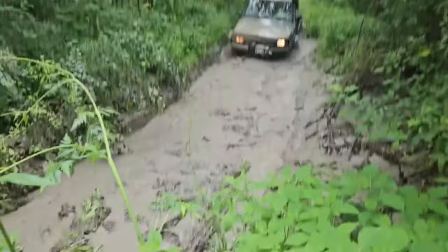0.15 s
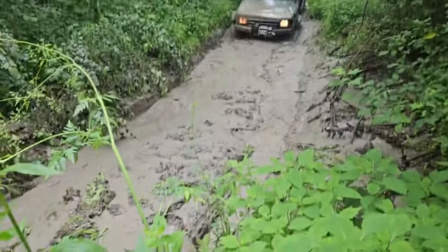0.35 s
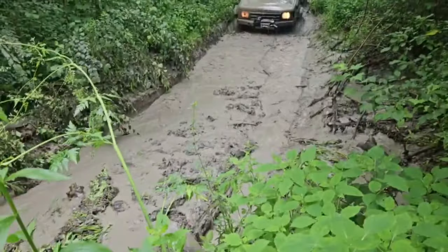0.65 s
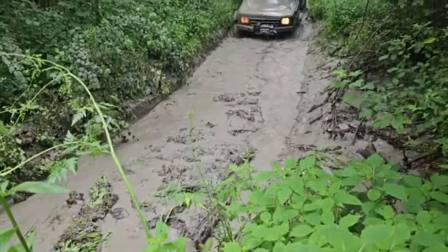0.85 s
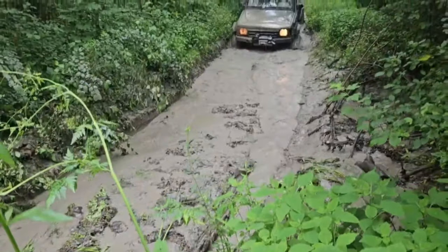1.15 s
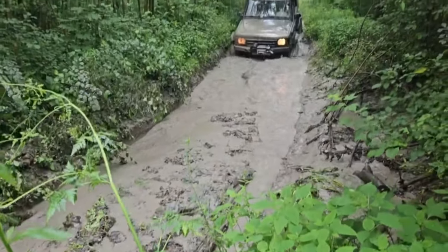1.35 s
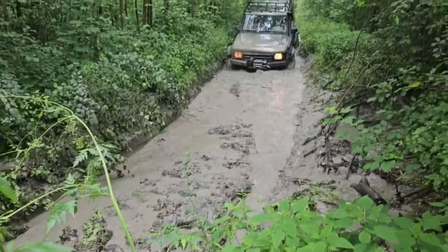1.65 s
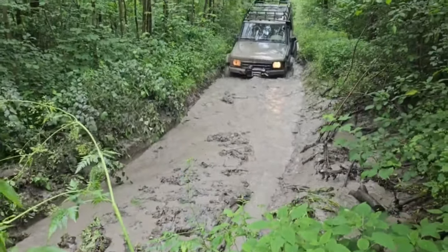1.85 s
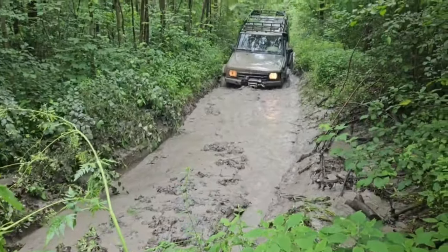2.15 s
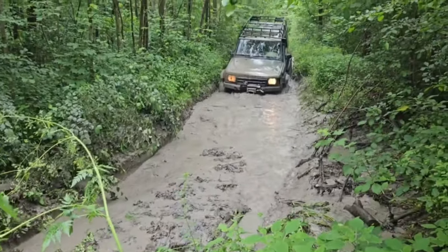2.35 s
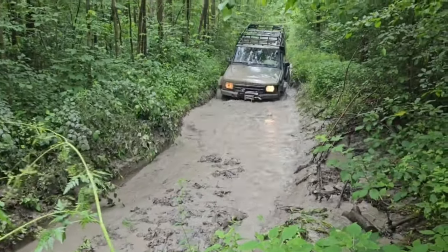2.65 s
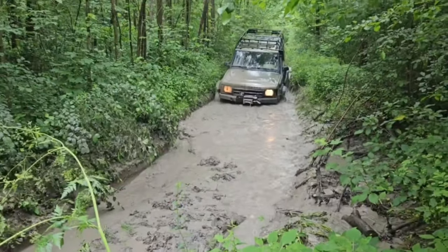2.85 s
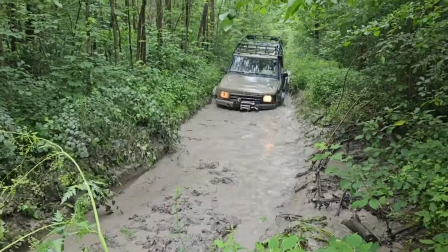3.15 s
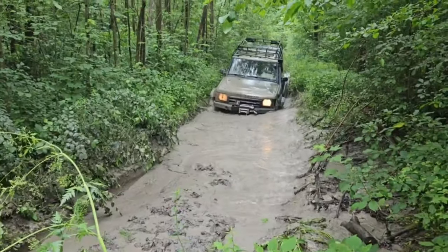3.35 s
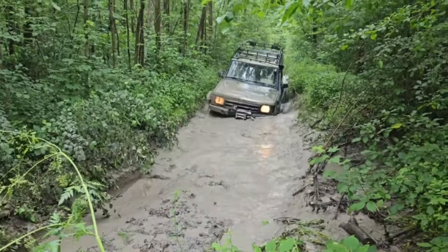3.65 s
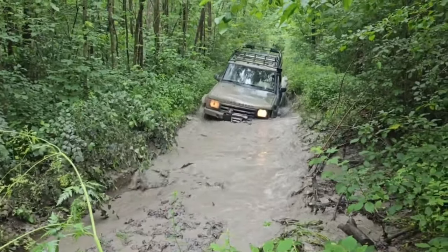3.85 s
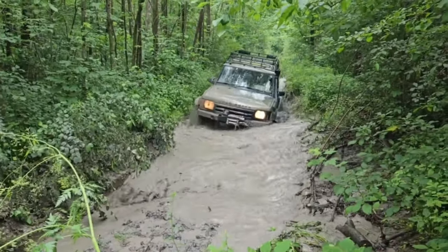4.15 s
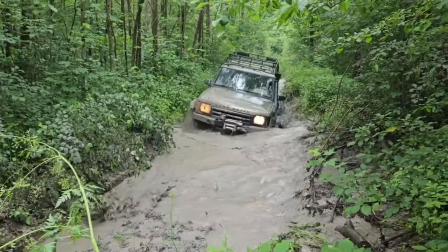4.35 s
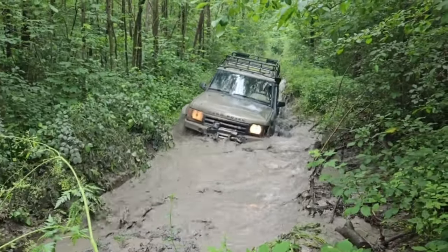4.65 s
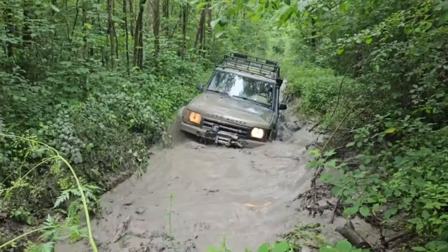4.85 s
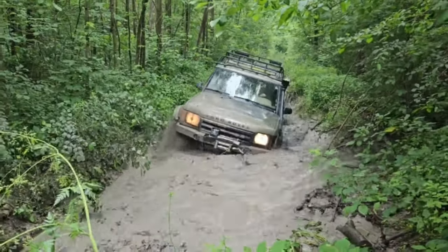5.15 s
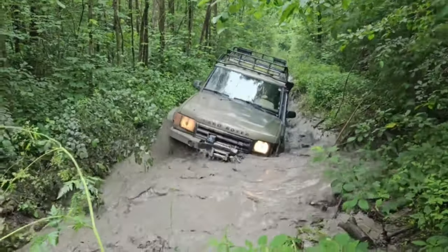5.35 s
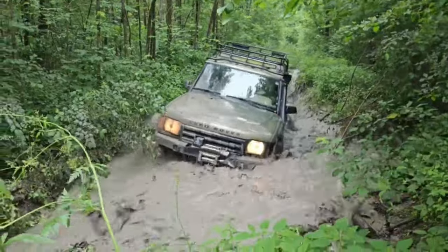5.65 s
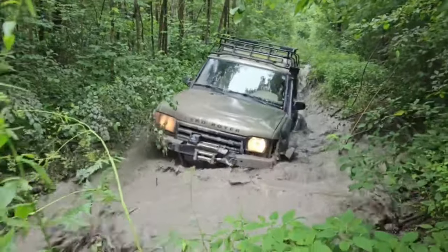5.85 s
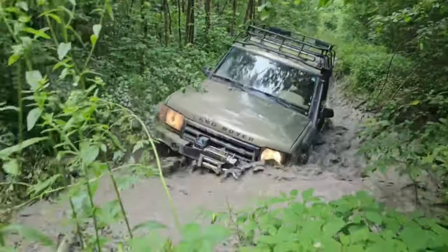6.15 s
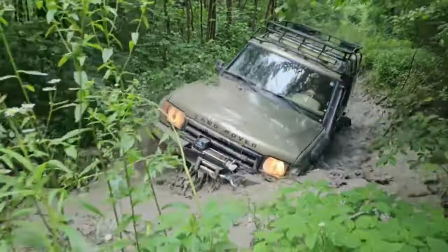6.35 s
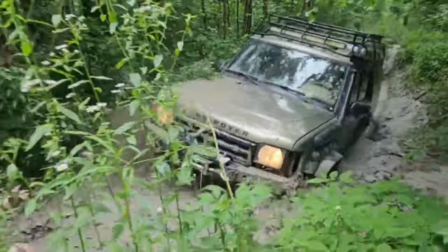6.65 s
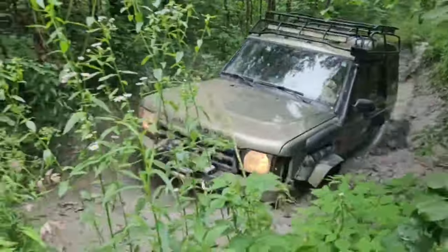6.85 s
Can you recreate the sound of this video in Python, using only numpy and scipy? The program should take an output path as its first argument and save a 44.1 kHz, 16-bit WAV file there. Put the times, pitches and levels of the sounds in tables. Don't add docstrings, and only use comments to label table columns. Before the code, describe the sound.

A throaty eight-cylinder engine sinks to a lumpy idle, then revs hard and roars closer through hissing, churning mud in a forest.

```python
import sys
import numpy as np
from scipy import signal
from scipy.fft import rfft, irfft, next_fast_len
from scipy.io import wavfile
from scipy.ndimage import uniform_filter1d

SR = 44100
rng = np.random.default_rng(int(sys.argv[2]) if len(sys.argv) > 2 else 0)


def unload_audio(sound):
    columns = np.transpose(np.atleast_2d(sound))
    steps = np.round(np.clip(columns, -1, 1) * 32767)
    wavfile.write(sys.argv[1], SR, steps.astype(np.int16))


def linear_from_db(decibels):
    return 10 ** (np.asarray(decibels, float) / 20)


N = 308259
ROOMY = next_fast_len(N)


def level(x, db):
    return x * linear_from_db(db) / np.sqrt(np.mean(x ** 2))


def curves(table):
    s, *columns = np.transpose(table)
    return [np.interp(np.arange(N) / SR, s, c) for c in columns]


def along(table, hz, column=1):
    table = np.array(table)
    return np.interp(np.log(np.maximum(hz, 1)), np.log(table[:, 0]), table[:, column])


def bumps(table):
    s, length, *strengths = np.transpose(table)
    coarse = np.arange(0, N, 32)
    shape = np.exp(-((coarse / SR - s[:, None]) / (length[:, None] / 2)) ** 2)
    return [np.interp(np.arange(N), coarse, db @ shape) for db in strengths]


def swell(start, attack, hold, release, db, quiet_db=-15):
    corners = np.cumsum([start, attack, hold, release])
    return db + np.interp(np.arange(N) / SR, corners, [quiet_db, 0, 0, quiet_db])


def walk(rate):
    k = int(SR / rate)
    steps = np.repeat(rng.standard_normal(N // k + 1), k)
    return 1.34 * uniform_filter1d(uniform_filter1d(steps, k), k)[:N]


def band(x, hz, width):
    return signal.lfilter(*signal.iirpeak(hz, hz / width, fs=SR), x)


def shelf(x, hz, db):
    treble = signal.sosfiltfilt(signal.butter(3, hz, "high", fs=SR, output="sos"), x)
    return x + treble * (linear_from_db(db) - 1)


def coloured(spectrum, flicker_db, rate):
    # (frequency [Hz], shared part [0-1])
    likeness = [(300, 0.99), (700, 0.85), (1400, 0.84), (2500, 0.05), (6000, 0.04)]
    hz = np.fft.rfftfreq(ROOMY, 1 / SR)
    like = np.clip(along(likeness, hz), 0, 1)
    shared, left, right = rfft(rng.standard_normal((3, ROOMY)))
    pair = np.sqrt(like) * shared + np.sqrt(1 - like) * np.array([left, right])
    pair = pair * linear_from_db(along([(13, -68)] + spectrum, hz))
    out = 0
    for octave in range(7, 15):
        part = np.cos(np.pi / 2 * np.clip(np.log2(hz + 1) - octave, -1, 1)) ** 2
        out = out + irfft(pair * part, ROOMY)[:, :N] * linear_from_db(flicker_db * walk(rate))
    return level(out, 0)


def splatter(rate, scatter_db, db):
    grains = (rng.random(N) < rate / SR) * linear_from_db(scatter_db * rng.exponential(size=N))
    tails = signal.lfilter([1], [1, -np.exp(-1 / (0.0085 * SR))], grains)
    return np.sqrt(1 + level(tails, db) ** 2)


def firing_beat(turns):
    return 1 + 0.049 * np.cos(16 * np.pi * turns)


def spray_hiss(turns, churn, surge, distance):
    # (frequency [Hz], density [dB per Hz])
    spectrum = [(880, -29), (1500, 1), (1790, -4), (2240, -3.5), (2810, -6), (6700, -8.5), (7320, -6.5),
                (8470, -7), (8900, -5.5), (9620, -13), (11000, -12.5), (12700, -8), (14800, -15.5),
                (15500, -14.5)]
    hiss = coloured(spectrum, flicker_db=0.83, rate=6.5) * splatter(rate=120, scatter_db=3.0, db=-10)
    leaves_db, leaves_m = 3.5, 3.7
    hiss = shelf(firing_beat(turns) * hiss, 6700, leaves_db * np.exp(-(distance / leaves_m) ** 2) - 2)
    air_db_per_m = 0.06
    hiss = shelf(hiss, 10600, air_db_per_m * (9.0 - distance))
    return linear_from_db(churn + surge + 7.0 + 0.5 * walk(5)) * hiss


def mud_roar(turns, churn, surge):
    # (frequency [Hz], density [dB per Hz])
    spectrum = [(190, 3.5), (330, -2.5), (439, -7.5), (515, -12), (544, -4.5), (1030, -9.5), (1400, -9),
                (1730, -18), (2200, -19), (2860, -43), (4840, -120)]
    roar = coloured(spectrum, flicker_db=0.33, rate=9) * splatter(rate=90, scatter_db=3.5, db=-11)
    return linear_from_db(-32.5 + 0.915 * (churn + 42) + surge) * firing_beat(turns) * roar


def drops():
    # (time [s], peak level [dB], pitch [Hz])
    flicks = [
        (.897, -41, 12500),
        (1.462, -38, 13000),
        (1.738, -38, 4500),
        (1.865, -36, 3200),
        (2.51, -45, 14000),
    ]
    out, t = np.zeros(N), np.arange(400) / SR
    for s, db, hz in flicks:
        i = int(s * SR)
        burst = band(rng.standard_normal(len(t)), hz, 0.25 * hz)
        out[i:i + len(t)] += linear_from_db(db) * 4 * np.exp(-t / 0.002) * burst
    return out


def panel_drone():
    # (start [s], attack [s], hold [s], release [s], level [dB])
    shaking = (4.25, .2, .75, .3, -42)
    ring = band(band(rng.standard_normal(N), 523.0, 30.0), 510.0, 54.0)
    return linear_from_db(swell(*shaking)) * level(ring, 0)


def belt_whine(turns):
    # (start [s], attack [s], hold [s], release [s], level [dB])
    slip = (4.8, .3, 1.4, .5, -48)
    whine_order = 45
    return linear_from_db(swell(*slip) + 10.5 + 1.5 * walk(12)) * np.sin(2 * np.pi * whine_order * turns)


def growl(turns):
    cylinders_db = [0, -1.5, -1.5, -11, -4.5, -7, -2, -4]
    # (frequency [Hz], width [Hz], level [dB])
    pipe = [(58.5, 13, 5), (102.7, 81, 9), (155, 68, -1.5), (273, 130, -5.5), (413, 134, -18.5)]
    firing = np.floor(8 * turns).astype(int)
    uneven_db = 0.54 * rng.standard_normal(firing[-1] + 1)[firing]
    size = linear_from_db(np.array(cylinders_db)[firing % 8] + uneven_db)
    puff = 0.26 + np.exp(-(8 * turns % 1) / 0.26)
    gas = size * puff * rng.standard_normal(N)
    return level(sum(linear_from_db(db) * band(band(gas, hz, width), hz, 1.13 * width) for hz, width, db in pipe), 0)


def orders(hz, turns, strong_db):
    # (order [per cycle], neighbour [order, 0 = growl], level over it [dB])
    minor = [(2.005, 3, -15), (4, 3, -31), (5.98, 5, -15), (6.96, 5, -15), (8.94, 8, -25), (9.91, 0, -3),
             (10.99, 0, -10), (11.77, 0, -10), (13.25, 0, -9), (15.18, 0, -13.5), (16.8, 0, -19.5),
             (19.06, 0, -10.5), (21.06, 0, -14.5), (24, 16, -21)]
    # (frequency [Hz], level [dB])
    tail_pipe = [(45, -11), (62, 5.5), (100, 8), (200, 2.5), (290, 3.5), (330, -7), (420, -7.5), (515, 1.5),
                 (580, -9)]
    lines = [(k, db) for k, db in strong_db.items() if k > 0]
    for k, near, db in minor:
        lines.append((k, strong_db[near] + db + along(tail_pipe, k * hz) + 4.94 * walk(8)))
    out = 0
    for k, db in lines:
        start = rng.random() * (k % 8 > 0)
        phase = k * turns + start + 0.021 * walk(22)
        out = out + np.sqrt(2) * linear_from_db(db + 0.4 * walk(25)) * np.cos(2 * np.pi * phase)
    return out


def exhaust(hz, turns, effort, growl_db, surge):
    # (frequency [Hz], level [dB])
    passed = [(33, -41), (55, -23.5), (67, -20), (100, -21), (138, -21.5), (156, -32.5), (180, -21),
              (260, -21.5)]
    # (frequency [Hz], level [dB])
    overtone = [(105, -23.5), (150, -24), (198, -44.5), (262, -29.5), (295, -34.5), (325, -42.5),
                (470, -45.5), (515, -35.5)]
    # (time [s], length [s], uneven
    # orders [dB], firing order [dB])
    chokes = [(.21, 0.11, -1, -17), (.74, 0.037, 0, -4), (3.24, .14, -3, 1.5), (4.11, 0.11, 4, -14.5),
              (4.6, 0.095, -5.5, -8), (4.735, 0.072, -8.5, -23), (4.82, .06, 3.5, 4),
              (4.89, 0.036, -10, -10), (5.07, 0.028, -9, -22), (5.14, 0.069, 2.5, 3.5),
              (5.225, 0.038, -15, -5.5), (5.34, 0.035, -1, -12), (5.44, .04, -10, -8),
              (5.53, 0.14, 2.5, -12.5), (5.55, 0.034, -20, -2), (5.68, 0.036, -7, -9),
              (5.92, 0.042, -3, -9), (6.01, 0.089, 5, -8.5), (6.12, .1, 5, -5.5), (6.3, .2, -3.5, -3.5),
              (4.38, 0.13, 1.5, -1.5), (0.03, 0.094, -6, 4), (3.38, .06, -1, 1.5), (5.8, 0.14, 0.5, 3),
              (6.61, 0.11, -6, -5), (6.45, 0.042, -8, -7), (6.88, 0.16, -2, -3)]
    uneven_choke, firing_choke = bumps(chokes)
    throttle_opens_s, opening_s = 2.46, 0.18
    closed = np.clip((throttle_opens_s - np.arange(N) / SR) / opening_s, 0, 1)
    uneven = uneven_choke - 6.5 * closed
    strong_db = {
        0: growl_db - 1.5 * closed + 1.36 * surge,
        3: 2.5 + uneven + along(passed, 3 * hz),
        5: -0.5 + uneven + along(passed, 5 * hz),
        8: 7 + effort + firing_choke + along(passed, 8 * hz),
        16: along(overtone, 16 * hz) - 2.5 * closed + firing_choke / 2 + 2.0 * walk(7),
    }
    gas_db = 3.5 + uniform_filter1d(growl_db + 0.35 * surge, size=4000)
    return orders(hz, turns, strong_db) + linear_from_db(gas_db) * growl(turns)


def scene():
    # (time [s], rate [Hz])
    speed = [(0, 17.3), (.19, 13.6), (.58, 12.25), (1.1, 9.2), (1.43, 9.3), (2.47, 6.6), (2.62, 8.0),
             (2.98, 15.25), (3.42, 23.1), (3.66, 25.3), (3.92, 26.1), (4.2, 23.7), (4.8, 27.5),
             (5.33, 28.3), (5.6, 30.35), (6.04, 29.85), (6.52, 32), (6.99, 31.75)]
    # (time [s], level [dB])
    firings = [(0, -7.5), (.55, -0.5), (1.0, -5.5), (1.5, -7.5), (1.8, -11), (2.4, -8.5), (2.65, 1.5),
               (3.15, 2), (3.4, -0.5), (3.7, -4.5), (4.5, -7), (5.15, -2), (5.7, -4.5), (6.2, -7.5),
               (6.5, 3), (6.99, -0.5)]
    # (time [s], level [dB])
    churning = [(0, -42), (.35, -44.5), (1.5, -48.5), (2.8, -49.5), (3.25, -47.5), (3.7, -43), (4.4, -41),
                (5.1, -39), (5.75, -37), (6.07, -36), (6.3, -35), (6.85, -38), (6.99, -38.5)]
    # (time [s], distance [m])
    approach = [
        (0, 27),
        (3, 21),
        (5.5, 9.38),
        (6.4, 5),
        (6.99, 1),
    ]
    # (time [s], length [s], growl [dB], roar [dB], hiss [dB])
    surges = [(1.19, 0.055, 5.5, 3.5, 0.5), (1.99, .08, 6, -1.5, -0.5), (3.35, 0.28, 6.5, 2.5, -1),
              (4.45, 0.16, 1, 3, 0), (4.87, 0.12, -10, 0.5, 0), (5.04, 0.036, 6, -1, 0.5),
              (5.56, 0.12, 1.5, -2, 0), (5.73, 0.18, 6.5, -1.5, -0.5), (3.9, 0.78, -1.5, 1.5, -1),
              (4.58, 0.072, 3, 0.5, 1), (.62, .15, -0.5, 1.5, 0), (6.02, 0.15, -2.5, 2, 0.5),
              (6.05, 0.41, -4, 0.5, 0), (6.29, .04, -12, 2, -0.5), (6.45, 0.14, 1.5, 4, 2),
              (6.66, 0.12, -9, 4, 1), (6.78, .08, 0.5, 1, -0.5), (4.97, 0.28, 2, -1, 0)]
    hz = uniform_filter1d(curves(speed)[0], size=4000)
    turns = np.cumsum(hz) / SR
    effort, churn, distance = curves(firings)[0], curves(churning)[0], curves(approach)[0]
    growl_surge, roar_surge, hiss_surge = bumps(surges)
    growl_db = -33.5 + 0.94 * (churn + 42) + 0.34 * effort
    mud = spray_hiss(turns, churn, hiss_surge, distance) + mud_roar(turns, churn, roar_surge) + drops()
    body = panel_drone() + belt_whine(turns)
    return mud + body + exhaust(hz, turns, effort, growl_db, growl_surge)


def roll_off(x):
    return signal.sosfilt(signal.butter(12, 15690, fs=SR, output="sos"), x)


def record(dry):
    # (frequency [Hz], left minus right [dB], right late by [samples])
    port_gap = [(60, 0.5, 2.2), (206, 2, 8.1), (940, 2, 7.1), (1810, 2, 12.1), (8000, 4, 11.4),
                (15000, -3, 12.6)]
    hz = np.fft.rfftfreq(ROOMY, 1 / SR)
    side = np.array([[0.5], [-0.5]])
    lag = np.exp(2j * np.pi * hz * side * along(port_gap, hz, column=2) / SR)
    ports = irfft(rfft(dry, ROOMY) * linear_from_db(side * along(port_gap, hz)) * lag, ROOMY)[:, :N]
    mix = signal.sosfiltfilt(signal.butter(1, 30, "high", fs=SR, output="sos"), ports)
    return roll_off(mix)


dry = scene()
out = record(dry)
unload_audio(out)
```